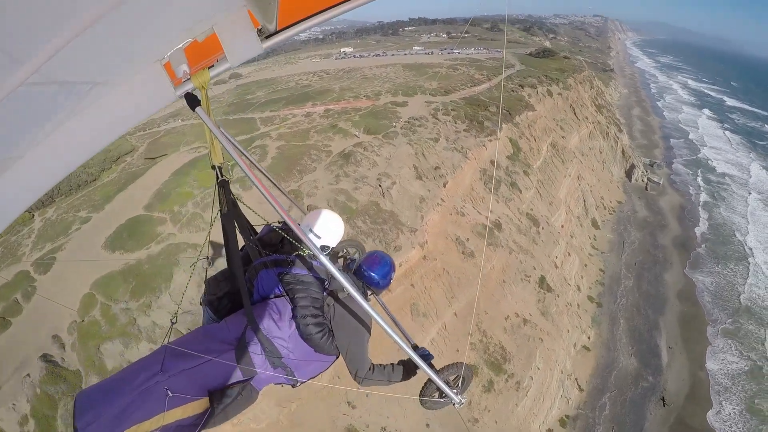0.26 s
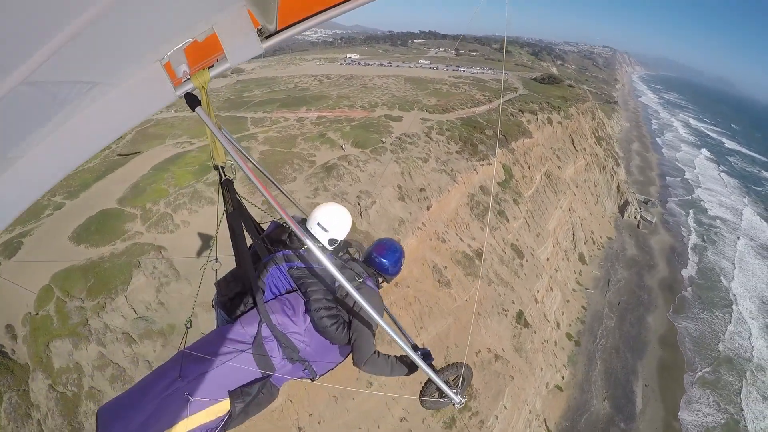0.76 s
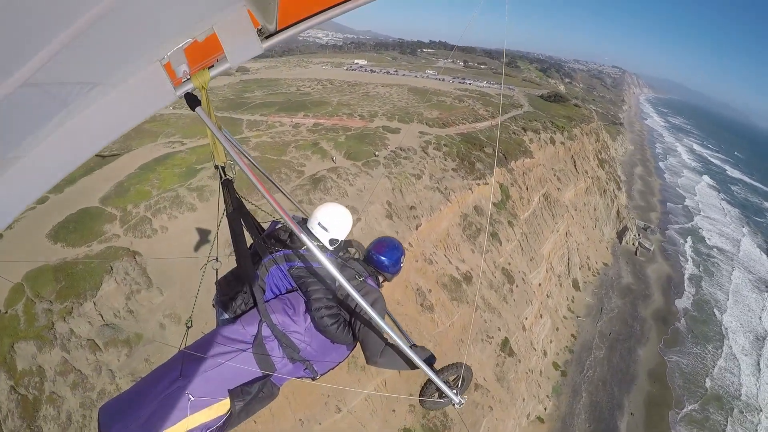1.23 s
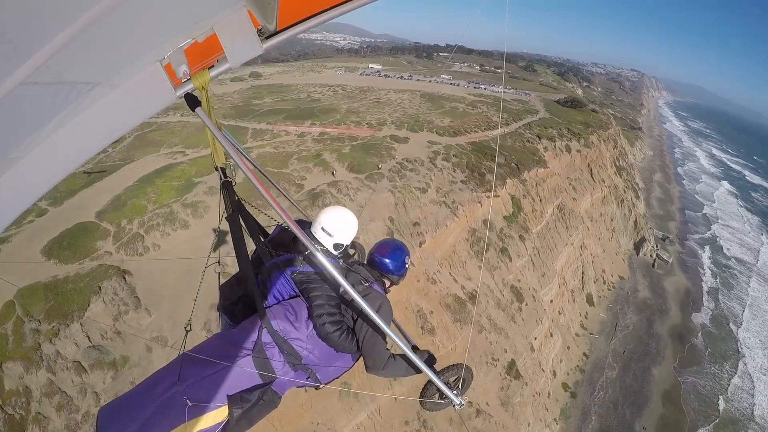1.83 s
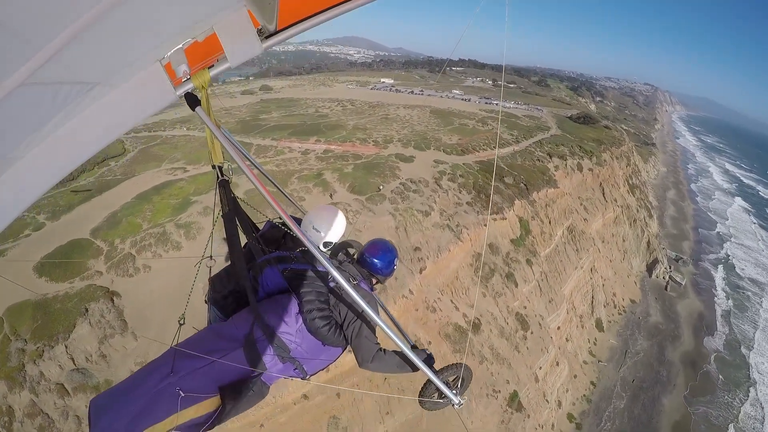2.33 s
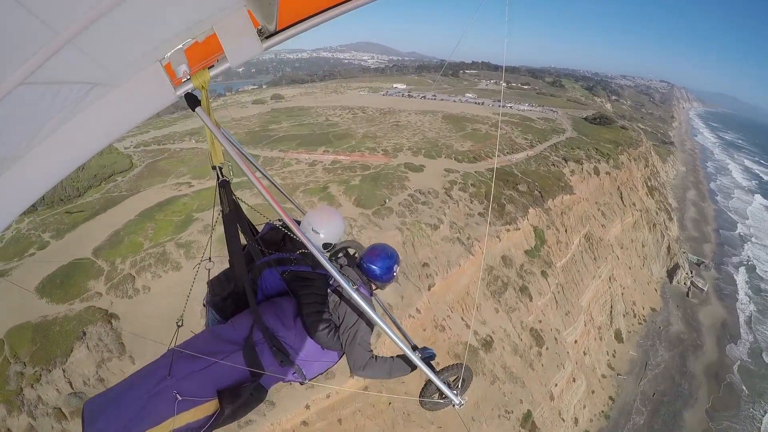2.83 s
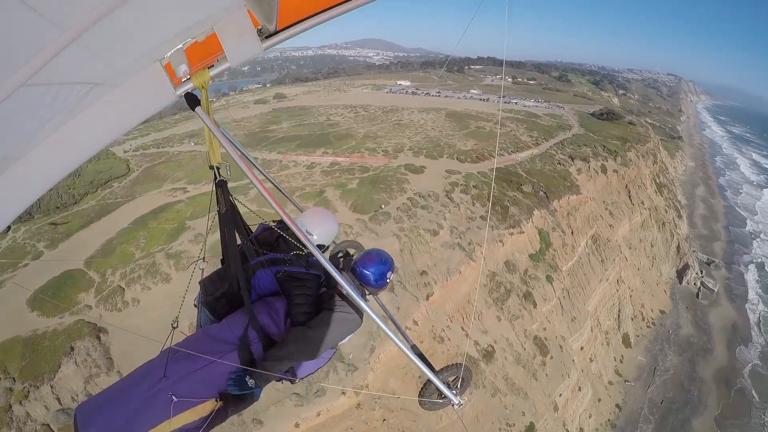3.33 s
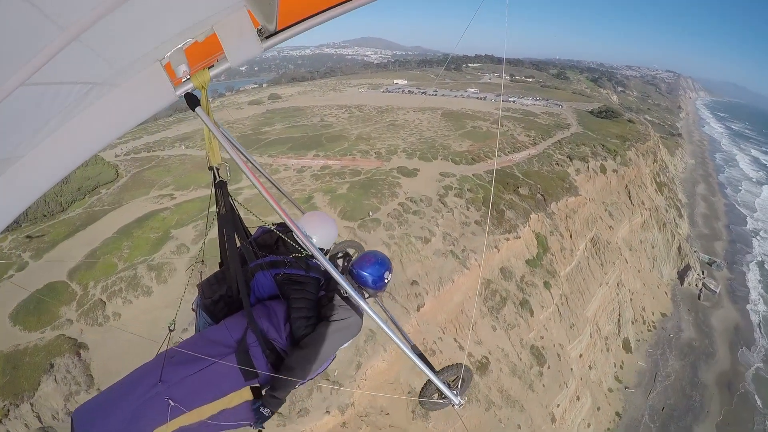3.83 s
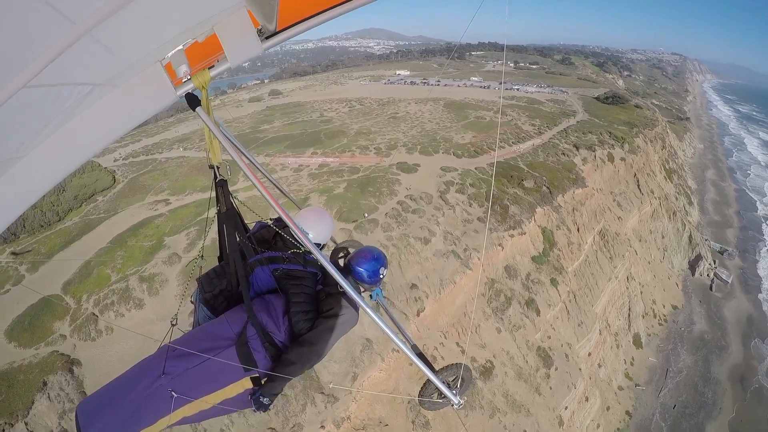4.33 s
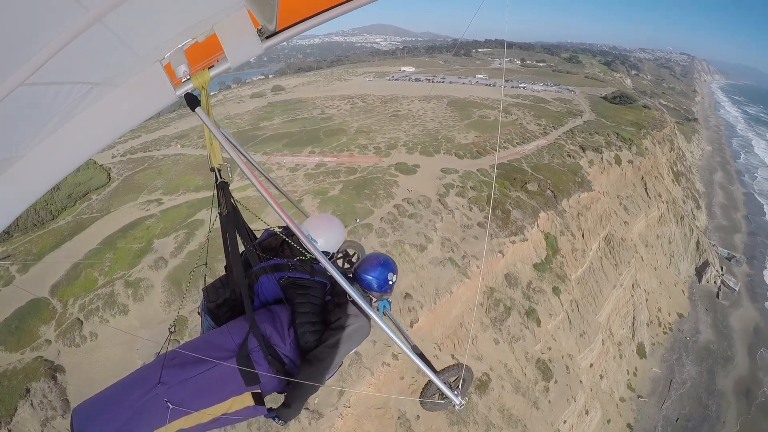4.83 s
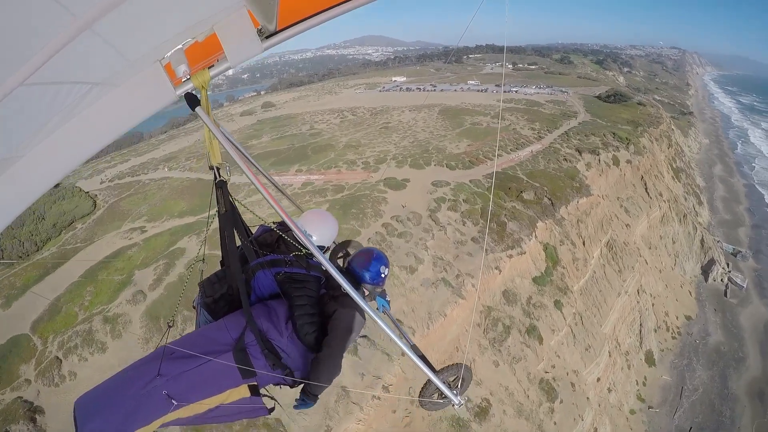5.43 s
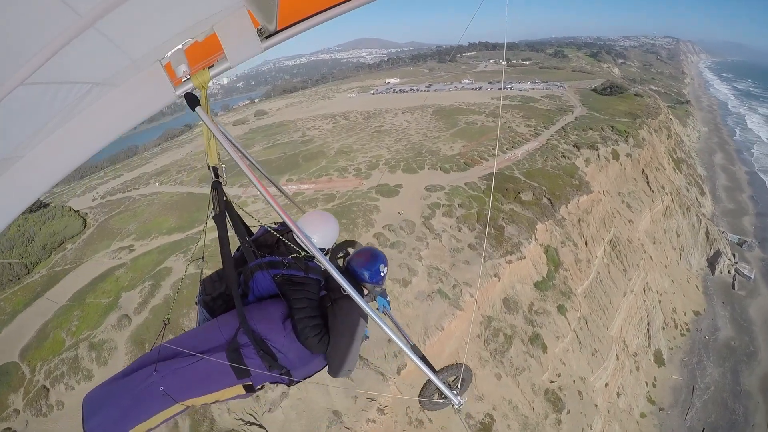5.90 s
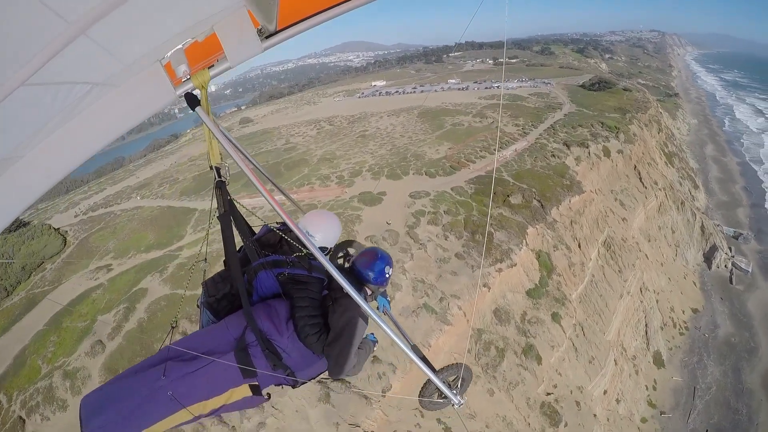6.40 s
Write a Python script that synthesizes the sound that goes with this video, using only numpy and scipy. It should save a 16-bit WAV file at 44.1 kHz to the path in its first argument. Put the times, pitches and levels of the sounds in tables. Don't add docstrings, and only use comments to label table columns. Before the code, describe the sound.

Inside a camera housing on a glider's wing, close and dry. From 0 to 2 seconds the flow is strongest: a fluttering sub-bass shake near 30 hertz, an uneven drone around 90, and a grainy midrange hiss peaking near 0.5. A thin wire whine flickers faintly beneath. Hard plastic snaps strike at about 0.2, 0.3, 0.5 and 1.6, among rattles and tiny metal ticks. From 2 to 4 the wind sinks and the rumble thins, with snaps near 2.3, 2.6, 3.3, 3.6 and 3.9 and loose chatter. At 4.1 a huge dull thump, deep and very short, jolts the wing amid clustered rattling, with a soft aftershock at 4.25. Then quieter rumble, breathy hollow hoots, especially near 4.9 and 5.3, and snaps at 4.4, 4.6, 4.9, 5.6, 5.8, 6.1 and 6.5. A barely audible cloth rustle passes at 5.6; hiss lifts slightly by 6.6.

```python
import sys
import numpy as np
from scipy import signal
from scipy.fft import rfft, irfft, next_fast_len
from scipy.io import wavfile
from scipy.ndimage import uniform_filter1d, map_coordinates

SR = 44100
rng = np.random.default_rng(int(sys.argv[2]) if len(sys.argv) > 2 else 0)


def put_to_file(sound):
    columns = np.atleast_2d(sound).T
    safe = np.clip(columns, -1, 1)
    whole_steps = np.round(safe * 32767)
    wavfile.write(sys.argv[1], SR, whole_steps.astype(np.int16))


def convert_level_to_amplitude(level_db):
    exponent = np.asarray(level_db, float) / 20
    return 10 ** exponent


N = 293706


def unit(x):
    return x / np.sqrt(np.mean(x ** 2) + 1e-20)


def curves(rows):
    s, *cols = np.transpose(rows)
    return [np.interp(np.arange(N) / SR, s, c) for c in cols]


def wobble(rate):
    knots = rng.standard_normal(int(N * rate / SR) + 4)
    return map_coordinates(knots, [np.arange(N) * rate / SR])


def bell(s, half_s):
    return np.exp(-((np.arange(N) / SR - s) / half_s) ** 2)


def swells(rows, rest_db):
    t = np.arange(0, N + 64, 64) / SR
    power = sum(convert_level_to_amplitude(2 * db) * np.exp(-2 * ((t - s) / half_s) ** 2) for s, db, half_s in rows)
    return np.sqrt(np.interp(np.arange(N) / SR, t, power) + convert_level_to_amplitude(2 * rest_db))


def filtered(x, response):
    m = next_fast_len(N + SR // 2)
    return irfft(rfft(x, m) * response(np.fft.rfftfreq(m, 1 / SR)), m)[:N]


def modes(rows):
    return lambda f: sum(convert_level_to_amplitude(db) * 1j * f * w / (c * c - f * f + 1j * f * w) for c, w, db in rows)


def soft(hz):
    return lambda f: 1 / (1 - (f / hz) ** 2 + 1.4j * f / hz) ** 2


def tone(hz, drift_hz, rate):
    return np.sqrt(2) * np.sin(2 * np.pi * np.cumsum(hz + drift_hz * wobble(rate)) / SR)


def breath(hz, width_hz):
    resonance = modes([(hz, width_hz, 0)])
    return unit(filtered(rng.standard_normal(N), lambda f: resonance(f) ** 2))


def rush(spectrum, patchy_db):
    z = signal.stft(rng.standard_normal(N), nperseg=512)[2]
    field = uniform_filter1d(rng.standard_normal(z.shape), 6, 0)
    field = uniform_filter1d(field, 8, 1)
    noise = signal.istft(z * convert_level_to_amplitude(patchy_db * unit(field)), nperseg=512)[1][:N]
    f, db = np.transpose(spectrum)
    return unit(filtered(noise, lambda hz: convert_level_to_amplitude(np.interp(np.log(hz + 1), np.log(f + 1), db))))


# (time [s], level [dB])
AIRSPEED = [(0.0, -38.5), (0.17, -35.5), (0.33, -34.5), (0.54, -33), (0.74, -34), (1.59, -35),
            (1.72, -36.5), (2.21, -38.5), (3.02, -42.5), (3.52, -43), (4.01, -42), (4.47, -42.5),
            (4.75, -43), (5.67, -44), (6.18, -42.5), (6.66, -40)]
CRUISE_DB = -40


def airspeed_db():
    return curves(AIRSPEED)[0]


def shock():
    return bell(4.085, half_s=0.034)


# (time [s], frequency [Hz])
SWAY_PITCH = [(0, 27.1), (.5, 33.03), (1.7, 32.37), (2.5, 27.48), (3.5, 24.8), (4.4, 27.99), (5.3, 23.91),
              (6.66, 25.05)]
# (time [s], peak [dB], half length [s])
SWAYS = [(0.1, -13.5, 0.1), (0.35, -13.5, 0.15), (0.67, -17, 0.061), (0.87, -18.5, 0.035), (1.0, -16, 0.12),
         (1.26, -18.5, 0.11), (1.46, -18, 0.076), (1.65, -14.5, 0.065), (1.83, -19.5, 0.093),
         (1.96, -20, 0.054), (2.05, -21, 0.04), (2.3, -25, 0.2), (2.54, -24.5, 0.36), (2.94, -20.5, 0.12),
         (3.13, -18, 0.033), (3.23, -15.5, 0.085), (3.38, -21.5, 0.041), (3.66, -21.5, 0.23),
         (4.08, -15, 0.067), (4.45, -21.5, 0.11), (4.62, -16.5, 0.024), (4.82, -25, 0.3),
         (5.18, -22.5, 0.24), (5.74, -22, 0.075), (6.11, -20.5, 0.19), (6.26, -22.5, 0.34)]


def spar_sway():
    sway_hz, = curves(SWAY_PITCH)
    rest_db = -43.5 + 0.3 * (airspeed_db() - CRUISE_DB) + 2.5 * wobble(7.3)
    gain = swells(SWAYS, rest_db) * convert_level_to_amplitude(-1.14 + 0.8 * wobble(7.8))
    return gain * tone(sway_hz, drift_hz=2.5, rate=12)


# (time [s], frequency [Hz])
DRONE_PITCH = [(0.0, 84.7), (0.07, 94.17), (1.02, 98.9), (1.26, 85.37), (1.91, 95.9), (2.0, 84.4),
               (2.34, 99.1), (2.5, 78.17), (2.86, 98.6), (3.32, 82.3), (3.39, 101.1), (4.03, 75.73),
               (4.43, 94.06), (4.56, 79.0), (4.73, 95.0), (6.05, 83.8), (6.47, 95.7), (6.66, 79.7)]
# (time [s], peak [dB], half length [s])
DRONES = [(0.0, -18, 0.0092), (0.21, -16.5, 0.16), (0.48, -11.5, 0.031), (0.63, -12, 0.067),
          (0.78, -12.5, 0.065), (0.92, -17.5, 0.048), (1.13, -16.5, 0.095), (1.33, -20.5, 0.063),
          (1.47, -15, 0.02), (1.54, -19, 0.013), (1.69, -14.5, 0.024), (1.85, -17.5, 0.17),
          (2.13, -16.5, 0.046), (2.27, -22, 0.059), (2.54, -27.5, 0.13), (2.71, -17.5, 0.066),
          (3.0, -22.5, 0.13), (3.19, -19.5, 0.019), (3.63, -20, 0.031), (3.99, -15, 0.01),
          (4.13, -25.5, 0.083), (4.27, -13.5, 0.022), (4.38, -17, 0.059), (4.66, -17.5, 0.028),
          (5.14, -25, 0.1), (5.28, -21, 0.084), (5.58, -23.5, 0.022), (5.8, -21, 0.023),
          (6.04, -23.5, 0.045), (6.21, -16.5, 0.016)]


def mount_drone():
    drone_hz, = curves(DRONE_PITCH)
    rest_db = -33.5 + 0.19 * (airspeed_db() - CRUISE_DB) + 4.8 * wobble(14)
    gain = swells(DRONES, rest_db) * convert_level_to_amplitude(-1.06 + 2.0 * wobble(25))
    return gain * tone(drone_hz, drift_hz=2.465, rate=22)


# (time [s], peak [dB], frequency [Hz], half length [s])
JOLTS = [
    (4.051, -20.5, 150, 0.0064),
    (4.068, -8.5, 98, 0.014),
    (4.069, -25.5, 239, 0.0049),
    (4.077, -36, 398, 0.0085),
    (4.095, -2.5, 76, 0.012),
    (4.122, -11, 45, 0.0098),
    (4.266, -36, 272, 0.0082),
    (4.258, -23, 111, 0.01),
]


def jolts():
    t = np.arange(N) / SR
    return sum(convert_level_to_amplitude(db) * bell(s, half_s) * np.cos(2 * np.pi * hz * (t - s)) for s, db, hz, half_s in JOLTS)


def structure():
    return (spar_sway() + mount_drone()) * (1 - shock()) + jolts()


# (time [s], peak [dB], bright edge [dB])
SNAPS = [(0.166, -18, -29), (0.31, -15.5, -28), (0.5387, -14.5, -40), (1.5584, -20.5, -25),
         (2.3322, -17.5, -36), (2.5666, -12.5, -29.5), (3.2707, -20, -33), (3.562, -19, -38),
         (3.8605, -20, -34.5), (4.142, -20.5, -31), (4.407, -16, -27), (4.619, -13, -30),
         (4.868, -16.5, -34), (5.5832, -20, -41), (5.8261, -25, -36), (6.0595, -22, -37),
         (6.5235, -17, -33)]
# (frequency [Hz], width [Hz], level [dB])
SNAP_MODES = [(2090, 550, 6), (2650, 340, -0.5), (3870, 500, -25)]
# (frequency [Hz], width [Hz], level [dB])
EDGE_MODES = [(4040, 1100, 4.5), (5840, 890, 1.5), (6900, 960, -6), (9800, 2500, -15)]


def snaps():
    blow, edge, t = np.zeros(N), np.zeros(N), np.arange(SR // 20) / SR
    for s, db, edge_db in SNAPS:
        start = round(s * SR)
        blow[start + np.array([-40, -24])] = convert_level_to_amplitude(db + 25.5) * np.array([-.4, 1])
        decay = convert_level_to_amplitude(db + edge_db + 15.0 - 60 * t / 0.0087)
        edge[start - 15:][:len(t)] += decay * rng.standard_normal(len(t))

    def stiff_mount(f):
        high_pass = soft(1550)(f) * (f / 1550) ** 4
        return high_pass ** 2 + modes([(900, 400, -14)])(f)

    def housing(f):
        return modes(SNAP_MODES)(f) * modes([(2300, 2200, 0)])(f) * soft(3600)(f) * stiff_mount(f)

    ring = filtered(blow, housing)
    tail = convert_level_to_amplitude(-32.5 - 60 * t / 0.066) * rng.standard_normal(len(t)) * (t > .002)
    tail[0] = 1
    tail[round(.0046 * SR)] += convert_level_to_amplitude(-20)
    ragged = filtered(edge, lambda f: modes(EDGE_MODES)(f) * soft(10500)(f))
    return signal.fftconvolve(ring, tail)[:N] + ragged


# (start [s], end [s])
FLUTTERS = [
    (3.83, 4.33),
    (4.77, 4.95),
    (6.45, 6.58),
    (2.86, 3.03),
    (.1, .8),
]


def flutter():
    rows = []
    for start, end in FLUTTERS:
        count = int(30 * (end - start))
        levels_db = -44 + 4 * rng.standard_normal((count, 2))
        rows += zip(rng.uniform(start, end, count), *levels_db.T)
    return rows


# (time [s], low tone [dB], high tone [dB])
RATTLE_HITS = [(.712, -35, -36), (0.748, -44, -52), (.92, -36, -40), (1.4489, -32.5, -38), (1.737, -30, -29.5),
               (2.282, -37, -31), (2.4388, -33.5, -42), (2.586, -39, -38), (2.713, -34, -36),
               (3.019, -29.5, -44), (3.222, -39, -53), (3.4551, -37, -46), (3.499, -37, -43), (3.987, -35, -40),
               (4.053, -38, -43), (4.062, -30, -36), (4.074, -32, -38), (4.247, -39, -39), (4.461, -38.5, -39),
               (4.6124, -32, -37), (4.783, -32, -39), (4.922, -41, -54), (5.7, -36.5, -42), (6.3974, -42, -42),
               (6.554, -38, -43),
               (0.111, -34, -32.5), (0.253, -47, -33), (.403, -39.5, -30.5), (0.658, -45, -34),
           (1.3362, -43, -32.5), (1.708, -34, -29.5), (2.23, -37, -41), (2.262, -37, -36),
           (2.398, -44, -36), (2.804, -52, -39), (2.784, -46, -37), (2.884, -46, -33), (2.901, -49, -40),
           (2.986, -39, -31), (3.277, -33, -31.5), (3.833, -40, -30.5), (3.8697, -41, -30.5),
           (3.913, -36, -38), (3.958, -40, -35.5), (4.168, -39, -32), (4.207, -40, -34),
           (4.2172, -48, -31.5), (4.272, -40, -32), (4.312, -44, -35), (4.832, -40, -39),
           (5.174, -43, -31.5), (5.311, -48, -38), (5.338, -44, -40.5), (5.902, -51, -40.5),
           (6.017, -47, -40), (6.233, -46, -44), (6.291, -31, -30.5), (6.494, -50, -33)]


def rattles():
    low, high, t = np.zeros(N), np.zeros(N), np.arange(SR // 25) / SR
    for s, low_db, high_db in RATTLE_HITS + flutter():
        start = round(s * SR)
        chatter = convert_level_to_amplitude(4.1 * rng.standard_normal(len(t)) - 4.5) * rng.standard_normal(len(t))
        chatter = chatter * np.exp(-t / 0.0062) * (1 - np.exp(-t / 0.0014))
        chatter[30] += 10
        low[start:][:len(t)] += convert_level_to_amplitude(low_db + 20.0) * chatter
        high[start:][:len(t)] += convert_level_to_amplitude(high_db + 23.0) * chatter
    low_tone = filtered(low, modes([(1189, 144, 1.5)]))
    high_tone = filtered(high, modes([(1665, 48, 3.0), (1950, 230, -4.5), (2620, 350, -4.5)]))
    return filtered(low_tone + high_tone, soft(2430))


# (time [s], peak [dB], frequency [Hz], top [dB])
TICKS = [(0.1426, -35.5, 5470, -20.5), (0.2522, -35, 6130, -28), (0.414, -29.5, 5640, -20),
         (1.3354, -34.5, 5420, -28), (1.4476, -26, 5520, -25.5), (2.439, -30.5, 7000, -18.5),
         (2.714, -37, 5900, -32.5), (2.8027, -47, 5700, -23), (3.4948, -42, 6000, -28.5),
         (3.9714, -37, 5740, -23.5), (3.9872, -30.5, 6940, -20.5), (4.1964, -41, 7000, -16),
         (4.4972, -36.5, 5450, -26.5), (4.8278, -42, 5300, -23), (5.176, -37, 5860, -38),
         (5.3114, -44, 5340, -17), (5.3373, -41, 5910, -36), (5.7009, -43, 7560, -11),
         (6.0127, -39, 5240, -31)]


def ticks():
    out, top, t = np.zeros(N), np.zeros(N), np.arange(SR // 50) / SR
    rise = 2.56 * (1 - np.exp(-t / 0.0016))
    for s, db, hz, top_db in TICKS:
        start = round(s * SR)
        noise = rng.standard_normal((2, len(t)))
        ping = np.sin(2 * np.pi * hz * t) * uniform_filter1d(noise[0], size=12) * 2.6
        out[start:][:len(t)] += convert_level_to_amplitude(db + 2 - 60 * t / 0.012) * rise * ping
        top[start:][:len(t)] += convert_level_to_amplitude(db + top_db + 7.0 - 60 * t / 0.011) * rise * noise[1]
    pings = filtered(out, lambda f: soft(9500)(f) / (1 + (4200 / (f + 1)) ** 6))
    return pings + filtered(top, modes([(10500, 4000, 0.5), (14000, 3000, -5)]))


# (time [s], peak [dB], half length [s])
WIRE = [(.18, -41, .05), (.3, -30, 0.014), (.36, -41, 0.016), (.49, -39.5, 0.029), (.6, -47, .02),
        (.7, -38, .028), (.83, -42, 0.061), (.98, -41.5, 0.031), (1.16, -43, .037), (1.3, -43, 0.14),
        (1.47, -40, 0.055), (1.64, -39, 0.034), (1.83, -51, .07), (1.97, -46, .05), (2.12, -63, .08),
        (2.26, -50, .03), (2.37, -46, 0.037), (2.6, -56, 0.041)]


def wire():
    hz, = curves([(0, 780), (.9, 778), (1.5, 770), (1.7, 765), (1.8, 724), (2.6, 695)])
    gain = swells(WIRE, rest_db=-53.0 + 1.8 * (airspeed_db() + 34.0))
    return gain * convert_level_to_amplitude(-0.5 + 1.4 * wobble(30)) * tone(hz, drift_hz=6, rate=40)


# (time [s], peak [dB], half length [s])
HUM = [(.15, -51, .06), (.5, -45, 0.055), (.75, -42, .05), (.87, -42, 0.065), (1.0, -42, 0.043),
       (1.2, -47, .08), (1.33, -43, .03), (1.5, -47, .04), (1.8, -51, .05), (2.05, -45, 0.027),
       (2.33, -50, 0.039), (4.25, -38.5, 0.0073), (4.275, -41, 0.008), (4.44, -44, 0.011),
       (4.617, -42, .006), (5.22, -44, 0.045)]


def hum():
    return swells(HUM, rest_db=-58) * breath(570, width_hz=60)


# (time [s], peak [dB], half length [s])
HOOT = [(0, -42, .03), (.65, -50, 0.076), (1.8, -41, 0.056), (2.05, -42.5, 0.041), (3.63, -57, 0.035),
        (3.87, -48.5, 0.1), (4.08, -43.5, 0.045), (4.25, -44, 0.15), (4.55, -45, 0.029), (4.8, -41, .03),
        (4.875, -38, 0.035), (4.945, -39.5, 0.02), (5.24, -40.5, 0.073), (5.34, -41.5, .04),
        (5.93, -45, 0.051), (6.34, -49, 0.044), (6.55, -53, 0.066)]


def tube_hoot():
    return swells(HOOT, rest_db=-57.5) * (0.79 * breath(435, width_hz=110) + 0.15 * tone(424, drift_hz=12, rate=40))


# (time [s], level [dB], half length [s])
RUSTLES = [
    (3.396, -72, 0.043),
    (4.47, -74, .035),
    (5.63, -71, 0.043),
]


def sail():
    swell = sum(convert_level_to_amplitude(db) * bell(s, half_s) for s, db, half_s in RUSTLES)
    spectrum = [(6000, -39), (9000, -5), (11000, -4), (14500, -7), (16000, -43)]
    return swell * convert_level_to_amplitude(4.4 * wobble(150)) * rush(spectrum, patchy_db=-2.0)


# (time [s], level [dB])
TURBULENCE = [(0.0, -14.5), (0.07, -31.5), (1.43, -25.5), (1.54, -22), (1.61, -35), (2.09, -24.5),
              (2.28, -32), (2.89, -27), (3.86, -33.5), (4.04, -31), (4.08, -13), (4.15, -23.5), (4.36, -37),
              (4.41, -29), (4.86, -34), (6.32, -28), (6.55, -34.5), (6.66, -27.5)]
# (frequency [Hz], density [dB/Hz])
BUFFET = [(7, -24.5), (22, -4.5), (42, 2), (92, 4.5), (112, -5), (150, -44), (330, -57), (700, -120)]


def buffet():
    lull_db = -9 * bell(3.7, half_s=0.058)
    level_db = curves(TURBULENCE)[0] + lull_db - 7.0 * shock() + 5.5 + 1.33 * wobble(9)
    return convert_level_to_amplitude(level_db) * rush(BUFFET, patchy_db=-0.5)


# (frequency [Hz], density [dB/Hz])
SHOULDER = [(70, -43.5), (105, 0.5), (128, 1.5), (150, -8.5), (200, -19.5), (260, -19.5), (320, -36.5),
            (700, -120)]
BODY = [(110, -30.5), (190, 2), (313, -8.5), (405, -2), (498, -10.5), (570, -1.5), (680, -6), (770, -2.5),
        (850, -9.5), (1150, -8.5), (1490, -13.5), (1600, -12.5), (2080, -35), (3520, -120)]
HISS = [(850, -27.5), (1450, -17), (1530, -25), (1710, -1.5), (1910, -5.5), (2200, 1), (2550, 1),
        (2970, -7.5), (3270, -5.5), (3930, -8), (5110, -39.5), (8650, -120)]
FIZZ = [(3600, -5), (4400, -4.5), (4750, -7), (5430, -2.5), (6050, -9), (6550, -9), (6900, -10), (7330, -8),
        (8200, -22.5), (9800, -18), (10900, -25.5), (12300, -30), (15000, -36.5), (16000, -74.5)]
# (frequency [Hz], width [Hz], level [dB])
CASE = [(1124, 86, -7), (1604, 13, 1.5)]


def boundary_layer():
    hiss_db = airspeed_db() - 0.6
    speed_db = hiss_db - CRUISE_DB
    eddies_db = 0.49 * wobble(9.8) + 0.6 * wobble(30) + 1.2 * wobble(110)
    shoulder = convert_level_to_amplitude(-36.5 + 1.34 * speed_db) * rush(SHOULDER, patchy_db=1.2)
    body = convert_level_to_amplitude(-44 + 0.65 * speed_db + 0.5 + 1.06 * eddies_db) * rush(BODY, patchy_db=1.17)
    hiss = convert_level_to_amplitude(hiss_db + 0.47 + 0.57 * eddies_db) * rush(HISS, patchy_db=1.3)
    fizz = convert_level_to_amplitude(-51 + 1.42 * speed_db + 1.57 + 0.75 * eddies_db) * rush(FIZZ, patchy_db=0.8)
    housing = modes(CASE)
    return shoulder + fizz + filtered(body + hiss, lambda f: 1 + housing(f))


def scene():
    contacts = snaps() + rattles() + ticks()
    whistles = wire() + hum() + tube_hoot()
    airflow = buffet() + boundary_layer()
    return (structure() + contacts + whistles + sail() + airflow)[None]


def top_cut(x):
    return signal.sosfilt(signal.butter(12, 15290, fs=SR, output="sos"), x)


def record(dry):
    self_noise = convert_level_to_amplitude(-77.5) * filtered(rng.standard_normal(N), modes([(13800, 3000, 0)]))
    return top_cut(dry + self_noise)


dry = scene()
out = record(dry)
put_to_file(out)
```